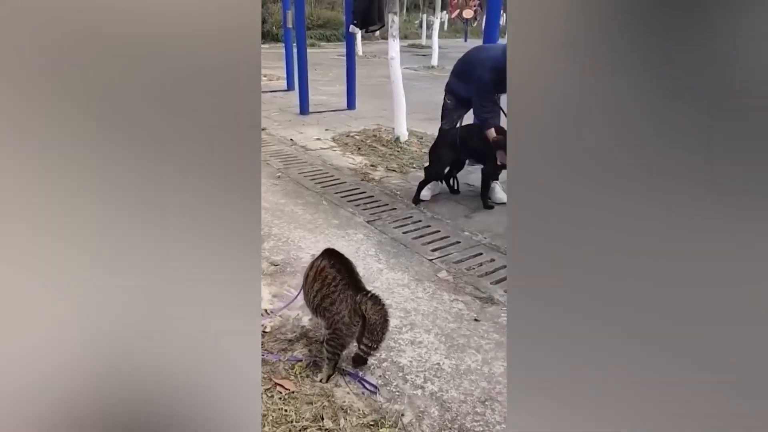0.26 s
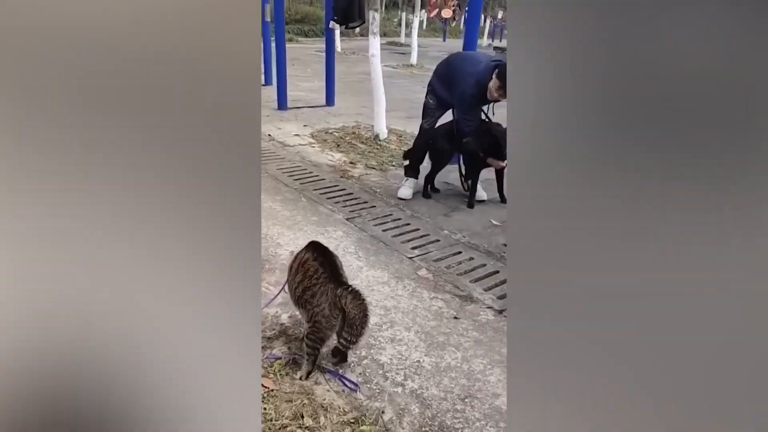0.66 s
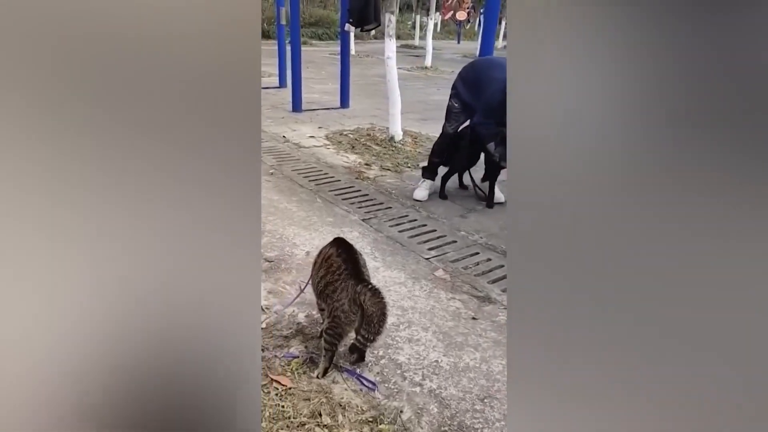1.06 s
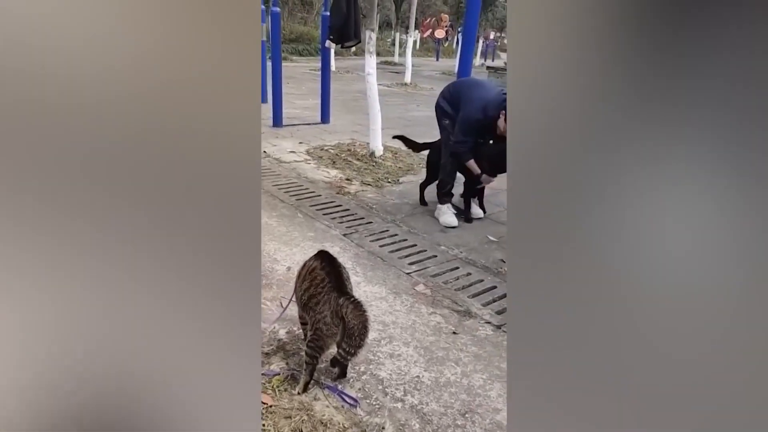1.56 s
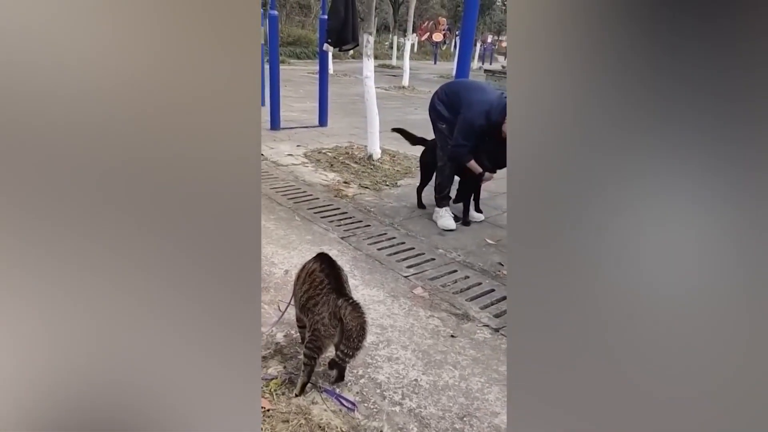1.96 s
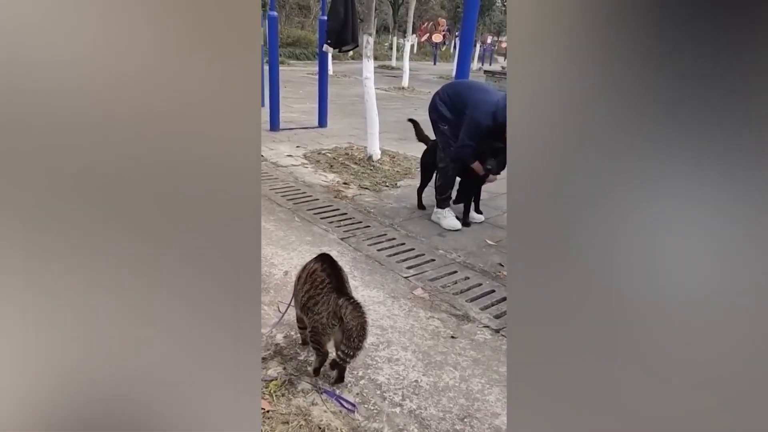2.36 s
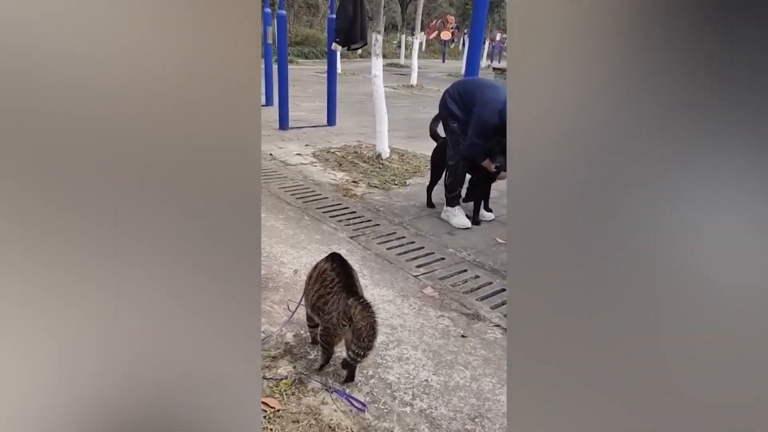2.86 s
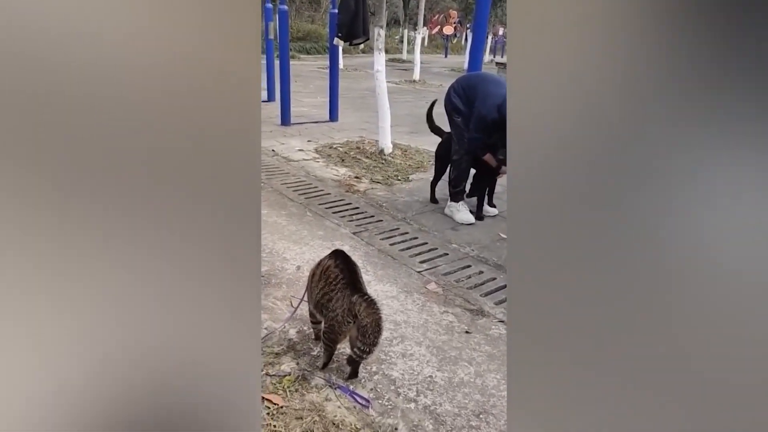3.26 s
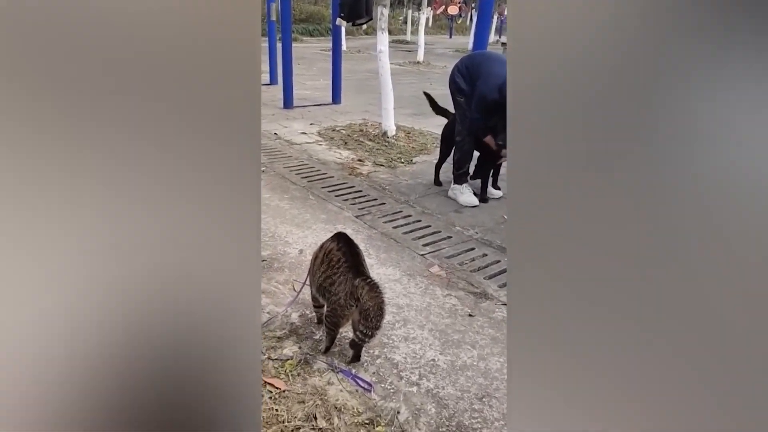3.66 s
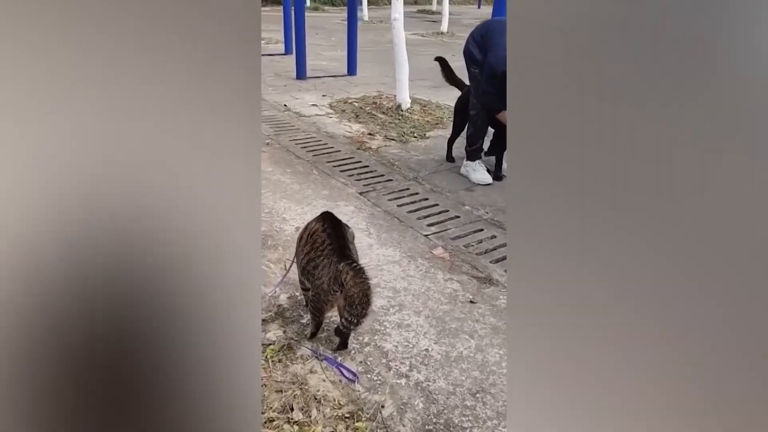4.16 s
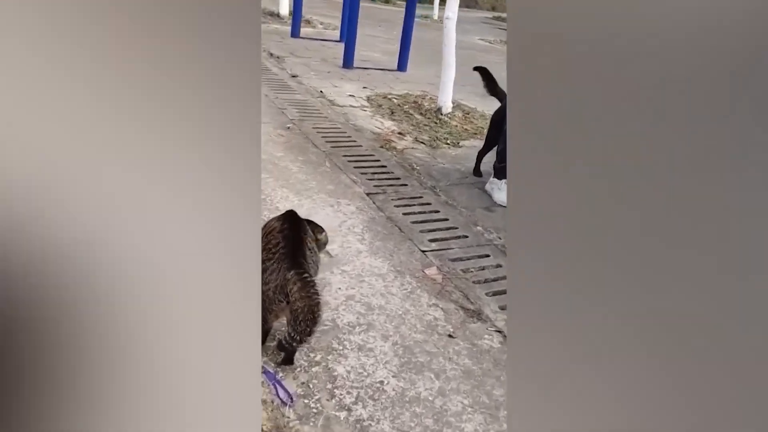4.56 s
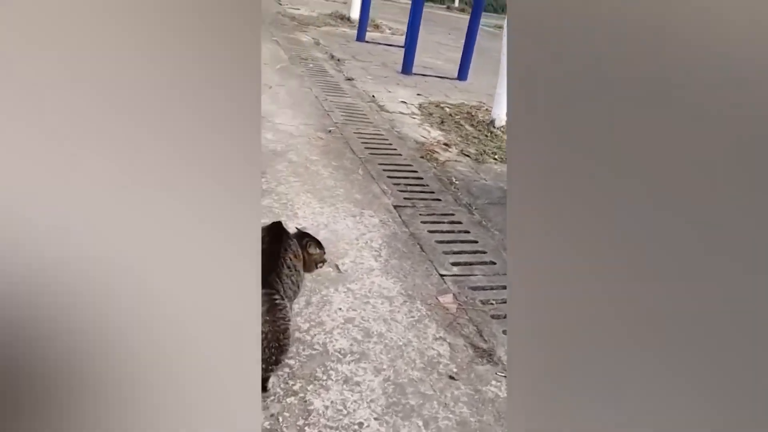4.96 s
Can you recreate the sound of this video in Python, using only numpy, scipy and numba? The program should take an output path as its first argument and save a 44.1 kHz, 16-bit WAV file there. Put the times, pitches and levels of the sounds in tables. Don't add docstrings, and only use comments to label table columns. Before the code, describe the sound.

Outdoors, a cat gives a short, rough, falling yowl, gasps, then creaks into a long rising yowl that clears and holds.

```python
import sys
import numpy as np
from scipy import signal
from scipy.fft import rfft, irfft, next_fast_len
from scipy.io import wavfile
from scipy.ndimage import uniform_filter1d
from numba import njit

SR = 44100
rng = np.random.default_rng(int(sys.argv[2]) if len(sys.argv) > 2 else 0)


def to_wav(s):
    ch = np.atleast_2d(s).T
    pcm = np.round(np.clip(ch, -1, 1) * 32767)
    wavfile.write(sys.argv[1], SR, pcm.astype(np.int16))


def amplitude_ratio(level_db):
    exponent = np.asarray(level_db, float) / 20
    return 10 ** exponent


N = 230466
TIME = np.arange(N) / SR
SHUT_S = 1.118
PARK_DB = -54.5

# (frequency [Hz], width [Hz], level [dB])
THROAT_RESONANCES = [(2910, 317, 3.5), (2250, 300, -10.5), (3297, 140, -8)]
# (time [s], first slap [dB], gap to second [s], second slap [dB])
SLAPS = [(1.5712, -24.5, 0.0045, -46), (1.581, -31, 0.0059, -17.5), (1.5961, -21.5, 0.0073, -18),
         (1.613, -25, 0.006, -18), (1.6296, -22, .006, -40), (1.6397, -31.5, .0061, -22.5),
         (1.6585, -20, .0061, -23.5), (1.6757, -22.5, .0053, -22.5), (1.6925, -21, .0052, -23),
         (1.7115, -29.5, .0051, -26.5), (1.7238, -29.5, .0044, -24.5)]


@njit
def low_pass(x, hz, damping):
    low, band_state, low_state = np.empty(len(x)), 0., 0.
    for i in range(len(x)):
        g = np.tan(np.pi * hz[i] / SR)
        band = (band_state + g * (x[i] - low_state)) / (1 + g * (g + damping[i]))
        low[i] = low_state + g * band
        band_state = 2 * band - band_state
        low_state = low_state + 2 * g * band
    return low


def moving_low_pass(x, hz, damping):
    return low_pass(x, hz, damping + 0 * hz)


def butter(x, order, hz, kind="low"):
    return signal.sosfilt(signal.butter(order, hz, kind, fs=SR, output="sos"), x)


def ring(x, hz, width):
    return signal.lfilter(*signal.iirpeak(hz, hz / width, SR), x)


def tract(x, modes):
    out = 0
    for k, (hz, width, db) in enumerate(modes):
        out = out + (-1) ** k * amplitude_ratio(db) * ring(ring(x, hz, width), hz, 2 * width)
    return out


def curves(table):
    s, *columns = np.transpose(table)
    return [np.interp(TIME, s, column) for column in columns]


def smooth_twice(x, s):
    k = int(s * SR)
    return uniform_filter1d(uniform_filter1d(x, k), k)


def hold(x, db):
    return x * amplitude_ratio(db) / np.sqrt(smooth_twice(x ** 2, 0.1) + 1e-18)


def per_cycle(cycles):
    return np.interp(cycles, np.arange(N // 50), rng.standard_normal(N // 50))


def delay(x, s):
    return np.interp(TIME - s, TIME, x, left=0)


def flap(hz, depth_db):
    unsteady_hz = hz * (1 + .1 * per_cycle(np.cumsum(hz) / SR))
    cycles = np.cumsum(unsteady_hz) / SR
    size = amplitude_ratio(3.5 * rng.standard_normal(N // 50))[cycles.astype(int)]
    width = .25 - .011 * depth_db
    dip = np.minimum(size, 1.5) * np.exp(-((cycles % 1 - .5) / width) ** 2)
    return depth_db * (dip - uniform_filter1d(dip, int(.04 * SR)))


def folds(hz, spread, lean):
    unrest = np.cumsum(np.minimum(hz, 190)) / SR
    phase = 2 * np.pi * np.cumsum(hz * (1 + spread * per_cycle(unrest))) / SR
    turn = np.exp(-hz / 2600 + 1j * phase)
    size_db = np.minimum(35 * spread, 5) * per_cycle(unrest)
    all_multiples = turn / (1 - turn)
    pulses = -np.real(np.exp(-1j * (.9 + lean)) * all_multiples) * amplitude_ratio(size_db)
    puffs = rng.standard_normal(N) * (1 + 1.7 * np.cos(phase))
    return hold(pulses, 0), butter(puffs, 2, 1300, "high")


def chest_and_mouth(source, hz, slack, choke_db, chest_db, mouth_hz, press_db, cut, gape_db):
    chest_source = source * amplitude_ratio(0.21 * choke_db)
    chest = moving_low_pass(chest_source, np.clip(cut, 1.1, 6) * hz, 1.48 - 0.56 * slack)
    chest = hold(chest, chest_db + 4.0)
    mouth_damping = 0.081 + 0.16 * np.clip((215 - hz) / 75.6, 0, 1)
    mouth = hold(moving_low_pass(source, mouth_hz, mouth_damping), chest_db + press_db)
    voice = moving_low_pass(chest - mouth, 1.8 * mouth_hz, 0.87)
    voice = moving_low_pass(voice, 1.54 * mouth_hz, 1.09)
    voice = voice - moving_low_pass(voice, .4 * hz, 1.4)
    voice = voice + 0.57 * np.clip((gape_db + 3.5) / 3, 0, 1) * ring(voice, 940, 120)
    return voice - 0.45 * np.clip(gape_db - .3, 0, 1) * ring(voice, 1320, 350)


def nose_and_cheek(source, chest_db, gape_db):
    # (frequency [Hz], width [Hz], level [dB])
    nose_modes = [(1150, 350, 0)]
    cheek_modes = [(2437, 220, 0)]
    nose = hold(tract(source, nose_modes), chest_db - 22)
    return nose + hold(tract(source, cheek_modes), chest_db - 30.5 + np.minimum(gape_db + 31, 0))


def torn_air(puffs, choke_db, chest_db, breath_db, gape_db):
    # (frequency [Hz], width [Hz], level [dB])
    nose_air_modes = [(680, 420, 0)]
    rasp_modes = [(4070, 1500, 10), (6400, 1400, 9), (8300, 1000, -8), (11900, 1600, -19)]
    fray_modes = [(2250, 300, 0)]
    nose_air_db = chest_db - 40 + 3 * np.minimum(-10.5 - gape_db, 0)
    fray_db = chest_db - 3.5 + 2 * np.minimum(breath_db, 0) + np.minimum(gape_db, 0)
    nose_air = hold(tract(rng.standard_normal(N), nose_air_modes), nose_air_db)
    rasp = hold(tract(puffs, rasp_modes), chest_db - 22 + 0.67 * breath_db)
    return nose_air + rasp + hold(tract(puffs * amplitude_ratio(-choke_db), fray_modes), fray_db)


def throat(source, choke_db, depth_db, chest_db, gape_db):
    top = amplitude_ratio(0.7 * np.minimum(gape_db + 2, 0)) * tract(source, THROAT_RESONANCES[-1:])
    rung = tract(source, THROAT_RESONANCES[:-1]) + top
    rung = butter(rung, 4, 3650)
    level_db = chest_db + np.minimum(gape_db, 1.2) + 1.2 * np.minimum(depth_db, 1.5) * per_cycle(22 * TIME)
    return hold(rung * amplitude_ratio(-0.75 * delay(choke_db, .003)), level_db)


def palate_and_teeth(hiss, chest_db, press_db, gape_db):
    # (frequency [Hz], width [Hz], level [dB])
    palate_modes = [(6935, 210, 2.5), (3900, 220, -22.5), (8720, 800, -4.5), (11400, 860, -16.5),
                    (12500, 800, -11.5)]
    # (time [s], frequency [Hz], level [dB])
    tongue_moves = [(0, 5470, 5.5), (.5, 5440, 1.5), (1.6, 5900, -3), (2.0, 5250, 0), (2.4, 5640, -2.5),
                    (3.0, 5630, -5.5), (3.6, 5900, -3), (3.8, 5890, -3.5), (3.93, 5820, 2.5),
                    (4.05, 5970, -2.5), (4.17, 6230, 2.5), (4.3, 6150, -5.5), (4.55, 5990, 2.5),
                    (4.75, 5310, 3), (4.9, 5290, -2.5), (5.1, 5780, 5.5)]
    tongue_hz, tongue_db = curves(tongue_moves)
    teeth = amplitude_ratio(-17.0) * moving_low_pass(tract(hiss, [(5900, 2140, 0.02)]), tongue_hz, 0.039)
    level_db = chest_db - 22 + 0.53 * gape_db - 0.061 * press_db + tongue_db
    level_db = level_db + 0.0355 * np.maximum(tongue_hz - 5887, 0)
    return hold(tract(hiss, palate_modes) + teeth, level_db + 2.1 * per_cycle(18 * TIME))


def cat():
    # (time [s], pitch [Hz], effort as level of the fundamental [dB])
    calls = [(.024, 238.2, -33), (.144, 253.3, -32), (.284, 241.5, -34), (.33, 251.3, -31.5),
             (.38, 250.8, -32.5), (.48, 275, -30.5), (.6, 203.3, -28.5), (.674, 180, -31),
             (.72, 176.8, -32.5), (.814, 148.5, -35), (.85, 143, -34.5), (.97, 134, -39),
             (1.066, 136, -37.5), (1.116, 125.2, -36.5), (1.74, 210, -39), (1.8, 247.5, -36),
             (1.92, 324, -36.5), (1.97, 306.4, -36), (2.13, 323.8, -35.5), (2.19, 312.7, -36),
             (2.29, 351.5, -38), (2.4, 400, -35.5), (2.44, 428.4, -35.5), (2.48, 413.4, -35.5),
             (2.65, 467.8, -35.5), (2.68, 460.8, -35), (2.79, 483.3, -34), (2.82, 460, -34.5),
             (2.856, 482, -32), (2.904, 453.5, -31.5), (2.942, 475.3, -31), (3.068, 442, -31.5),
             (3.126, 455, -31.5), (3.216, 441.6, -31), (3.38, 453.3, -29), (3.45, 444.6, -29.5),
             (3.58, 444.4, -29), (3.7, 466, -29), (3.735, 473.3, -29), (3.8, 468.8, -29),
             (3.886, 463.9, -27), (4.0, 467.6, -27.5), (4.13, 473.7, -26), (4.186, 462, -28),
             (4.212, 449, -25), (4.25, 433.8, -25), (4.32, 427.7, -25.5), (4.41, 425, -26),
             (4.644, 412.4, -26.5), (4.706, 414.7, -26), (4.74, 411.3, -27), (4.796, 409.3, -25),
             (4.876, 404, -25), (5.046, 400.2, -26), (5.065, 397, -25.5), (5.156, 394, -26),
             (5.23, 390, -25.5)]
    # (time [s], resonance [Hz], press of the folds [dB], chest cut-off [multiples of pitch], jaw gape [dB])
    mouth_moves = [(.37, 1386, 3, 2.6, -8.5), (.45, 1158, 2.5, 2.9, -17), (.56, 580, -8.5, 2.8, -27.5),
                   (.66, 557, 3.5, 2.2, -43), (1.12, 494, 4, 1.8, -48.5), (1.58, 698.6, 6.5, 1.8, -23),
                   (1.72, 463, 8.5, 2.0, -38.5), (1.79, 715, 3.5, 1.9, -29), (1.88, 975, 1.5, 1.9, -20),
                   (2.05, 1047, 8, 1.8, -16), (2.1, 1103, 4.5, 1.8, -10), (2.15, 1356, 2.5, 1.7, -8),
                   (2.22, 1440, 4.5, 1.7, -2), (2.38, 1950, -2.5, 1.5, 1.5), (2.75, 1890, -2, 2.1, 1),
                   (3.2, 1708, 1, 2.7, 0.5), (3.45, 1670, 2.5, 3.2, 1), (3.6, 1655, 1.5, 2.7, -0.06),
                   (3.78, 1496, 6, 1.5, -2.5), (3.92, 1410, 8.5, 1.8, -6.5), (4.0, 1367, 11, 2.0, -3),
                   (4.05, 1350, 9, 2.0, -4.5), (4.08, 1300, 4, 2.2, -23.5), (4.115, 1148, 6.5, 2.2, -18),
                   (4.16, 1105, 5, 2.0, -14.5), (4.21, 1150, 2, 2.0, -19), (4.28, 1038, 2.5, 2.3, -13),
                   (4.5, 1093, 4.5, 2.4, -10.5), (4.7, 1053, 2, 2.0, -15.5), (4.9, 1078, -3, 1.6, -21.5),
                   (5.23, 1140, -4, 1.5, -37.5)]
    # (time [s], flap rate [Hz], choke [dB], spread of cycle length [0-1], breath under the pulses [dB])
    roughness = [(0, 65, 9, .024, -21), (.4, 60, 8, .02, -21), (.5, 53, 2, .01, -26),
                 (.66, 51, 6.5, .04, -26), (1.12, 54, 7.5, .045, -26), (1.57, 63, 9, .04, -24),
                 (1.74, 62.5, 7, .04, -24), (1.9, 63, 6.5, .036, -19), (1.96, 63, 9, .026, -21),
                 (2.2, 68, 9, .028, -8), (2.4, 69, 4.2, .036, 4), (2.74, 67.5, 3.2, .028, 2),
                 (2.85, 66, 3.4, .02, -6), (3.2, 64, 3.4, .018, -9), (3.45, 63, 3, .018, -12),
                 (3.6, 62.5, 1.8, .011, -20), (3.68, 61, 1.1, .008, -25), (3.76, 60, .8, .006, -28),
                 (3.86, 58.5, .3, .002, -40), (4.12, 55, .2, .002, -42), (4.22, 52.5, .3, .002, -40),
                 (4.3, 52.5, .65, .004, -33), (4.72, 51, .65, .004, -34), (4.92, 50, .6, .004, -38),
                 (5.05, 49, .25, .002, -42)]
    hz, chest_db = curves(calls)
    mouth_hz, press_db, cut, gape_db = curves(mouth_moves)
    flap_hz, depth_db, spread, breath_db = curves(roughness)

    choke_db = flap(flap_hz, depth_db)
    hz = hz * (1 + .4 * np.minimum(spread, .03) * per_cycle(17 * TIME))
    slack = np.clip((300 - hz) / 130, 0, 1)
    drop_per_db = .027 * (1 + .7 * np.minimum(2 * slack, 1))
    lean = 2.8 * np.clip((360 - hz) / 130, 0, 1)
    pulses, puffs = folds(hz * (1 - drop_per_db * choke_db), spread, lean)
    choke_db = choke_db * np.clip(depth_db / 7, .7, 1)

    source = amplitude_ratio(-choke_db) * (pulses + amplitude_ratio(breath_db) * puffs)
    source = butter(source, 2, 95, "high")
    treble_breath_db = .6 * breath_db - 4 + np.minimum(breath_db + 33, 0)
    hiss = amplitude_ratio(-choke_db) * (pulses + amplitude_ratio(treble_breath_db) * puffs)

    voice = chest_and_mouth(source, hz, slack, choke_db, chest_db, mouth_hz, press_db, cut, gape_db)
    voice = voice + nose_and_cheek(source, chest_db, gape_db)
    voice = voice + torn_air(puffs, choke_db, chest_db, breath_db, gape_db)
    voice = voice + throat(source, choke_db, depth_db, chest_db, gape_db)
    voice = voice + palate_and_teeth(hiss, chest_db, press_db, gape_db)
    voice = voice - .7 * np.clip((TIME - 3.9) / 0.099, 0, 1) * ring(voice, 1934, 270)
    catch = np.clip(per_cycle(55 * TIME), 0, 1.6) ** 2
    voice = voice * amplitude_ratio(-1.3 * np.minimum(depth_db, .9) * catch)
    open_s = 1.734
    return voice * np.interp(TIME, [SHUT_S - 0.006, SHUT_S, open_s, open_s + 0.0097], [1, 0, 0, 1])


def park():
    # (frequency [Hz], level per Hz [dB])
    park_spectrum = [(25, -24), (65, 2), (130, -12), (300, -8.5), (1000, -21), (4000, -28), (8000, -39),
                     (13000, -41.5)]
    out, swell = 0, per_cycle(2.2 * TIME)
    hz_at, db_at = np.transpose(park_spectrum)
    for hz in 30 * 2 ** np.arange(0, 8.9, .5):
        db = np.interp(np.log(hz), np.log(hz_at), db_at) + 10 * np.log10(hz)
        db = db + 0.44 * swell + 1.0 * per_cycle(9 * TIME)
        mid, side = (ring(ring(rng.standard_normal(N), hz, hz / 2), hz, hz) / np.sqrt(hz) for _ in range(2))
        out = out + amplitude_ratio(db) * np.array([mid, min(hz / 9000, .6) * side])
    return out * amplitude_ratio(PARK_DB) / np.std(out[0])


def gasp():
    # (frequency [Hz], width [Hz], level [dB])
    gasp_modes = [(354, 250, 0.5), (1300, 740, -6), (2840, 340, -4.5), (5900, 896, -21.5)]
    # (time [s], peak [dB], frequency [Hz])
    lip_ticks = [
        (1.163, -49.5, 2424),
        (1.162, -56.5, 6200),
        (1.579, -45.5, 5910),
        (1.597, -46.5, 5900),
        (1.611, -53, 5900),
        (4.166, -35, 1150),
    ]
    air = tract(rng.standard_normal(N) * amplitude_ratio(2.5 * per_cycle(60 * TIME)), gasp_modes)
    start, gasp_db, leak_db = 1.388, -57, -92
    end = start + .095
    air_db = np.interp(TIME, [SHUT_S, start, start + .004, end, end + .014, end + .074],
                       [leak_db, leak_db + 12, gasp_db, gasp_db + 4, gasp_db - 8.5, leak_db])
    out = hold(air, air_db) * ((TIME > SHUT_S) & (TIME < SLAPS[0][0]))
    for s, db, hz in lip_ticks:
        after = np.maximum(TIME - s, 0)
        out = out + amplitude_ratio(db) * np.exp(-after / 0.0034) * np.sin(2 * np.pi * hz * after)
    return out


def moan():
    # (time [s], pitch [Hz], level [dB])
    hum = [
        (1.135, 308, -71.5),
        (1.16, 296, -53.5),
        (1.21, 306.4, -53.5),
        (1.27, 299, -73),
    ]
    hz, db = curves(hum)
    tone = np.sin(2 * np.pi * np.cumsum(hz) / SR)
    return amplitude_ratio(db + 5.4 * per_cycle(70 * TIME)) * tone * (db > hum[0][2])


def croak():
    # (time [s], resonance [Hz], damping [width over centre])
    creak_mouth = [
        (1.57, 742, 0.89),
        (1.65, 597, 0.38),
        (1.73, 486, 0.22),
    ]
    flow = np.zeros(N)
    for s, first_db, gap, second_db in SLAPS:
        for at, db in ((s, first_db), (s + gap, second_db)):
            flow = flow + amplitude_ratio(db) * np.exp(np.minimum(TIME - at, 0) / 0.00074) * (TIME < at)
    hz, damping = curves(creak_mouth)
    rung = moving_low_pass(flow, hz, np.clip(damping, .1, 2))
    rung = moving_low_pass(rung, 1.4 * hz, 1.4)
    wet = flow * np.exp(-np.maximum(TIME - 1.61, 0) / 0.027)
    spit = tract(wet * rng.standard_normal(N), [(6200, 3200, 0)])
    rung = rung + amplitude_ratio(-13.5) * tract(wet, THROAT_RESONANCES) + amplitude_ratio(-30.5) * spit
    return amplitude_ratio(3.5) * (rung - smooth_twice(rung, 0.0075))


def patchy(x):
    size = next_fast_len(N)
    spectrum, hz, out = rfft(x, size), np.arange(size // 2 + 1) * SR / size, 0
    edges = [90, 180, 340, 690, 1100, 1600, 2000, 2500, 3300, 3800, 4700, 6500, 7500, 10000, 13000]
    for low, high in zip(edges, edges[1:]):
        heard = 1. * (per_cycle(rng.uniform(5, 9) * TIME) > .45)
        band = irfft(spectrum * ((hz >= low) & (hz < high)), size)[:N]
        out = out + uniform_filter1d(heard, 600) * band
    return out


def scene():
    # (delay [s], level [dB])
    echo_paths = [
        (.0031, -25),
        (0.014, -21),
        (0.037, -28),
        (.052, -26),
        (0.082, -30),
    ]
    near = cat() + croak() + gasp() + moan()
    mid = near + sum(amplitude_ratio(db) * delay(near, s) for s, db in echo_paths)
    over_db = 10 * np.log10(1 + uniform_filter1d(near ** 2, int(.3 * SR)) / amplitude_ratio(2 * PARK_DB))
    air, air_side = park() * amplitude_ratio(-0.041 * over_db)
    lean = 1.68 * delay(near + 1.9 * ring(near, 5500, 3000), .0016)
    turned = np.clip((TIME - 0.483) / .03, 0, 1)
    side = amplitude_ratio(-23.5 + 1 * TIME) * turned * patchy(lean + 8 * air_side)
    return mid + air + np.array([side, -side])


def top_cut(x):
    return signal.sosfilt(signal.butter(12, 13450, fs=SR, output="sos"), x)


def record(dry):
    mix = dry * np.minimum((TIME[-1] - TIME) / .0004, 1)
    return top_cut(mix)


dry = scene()
out = record(dry)
to_wav(out)
```